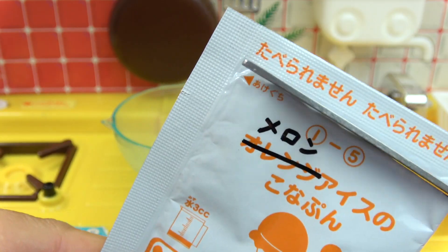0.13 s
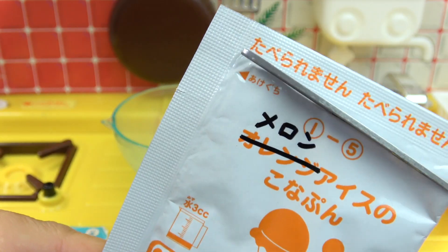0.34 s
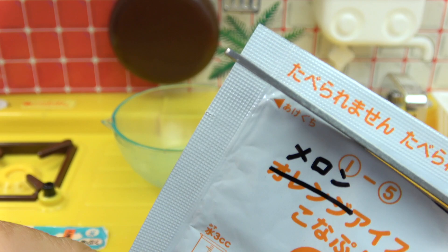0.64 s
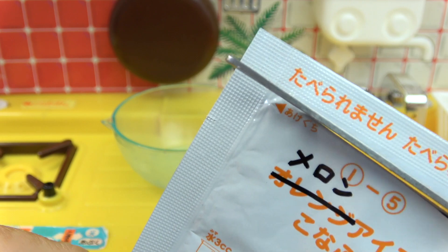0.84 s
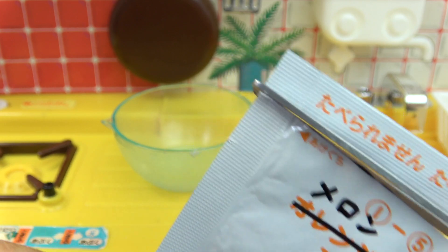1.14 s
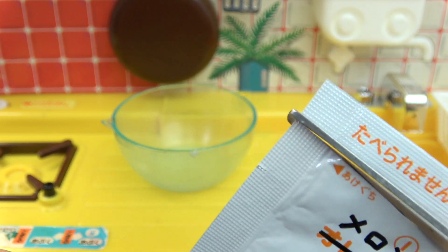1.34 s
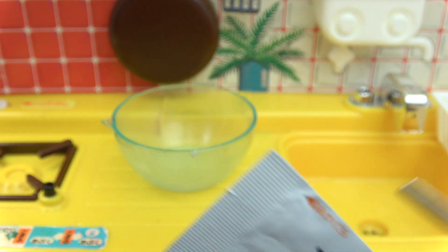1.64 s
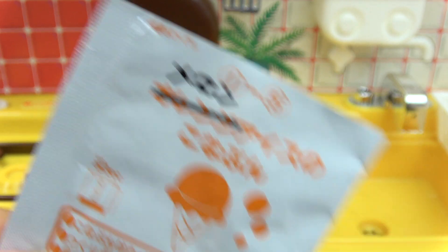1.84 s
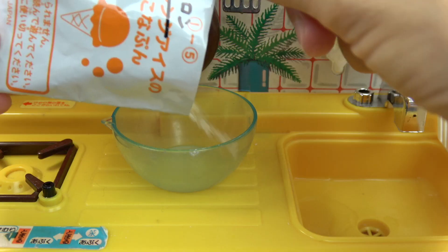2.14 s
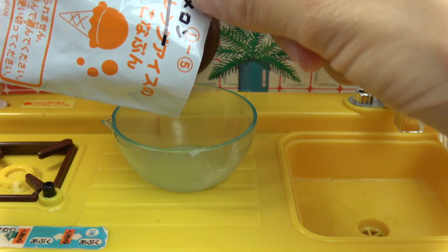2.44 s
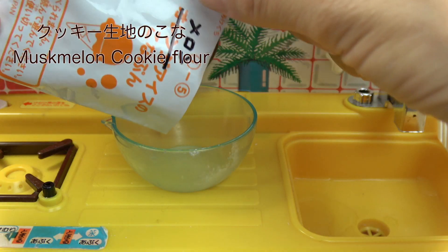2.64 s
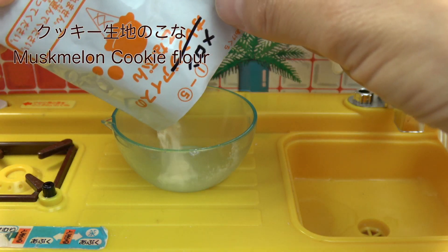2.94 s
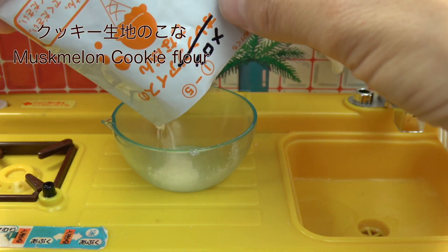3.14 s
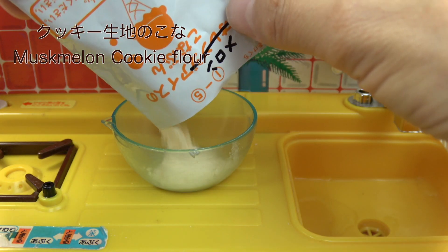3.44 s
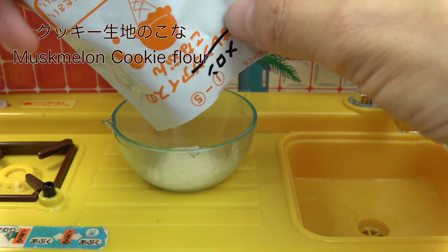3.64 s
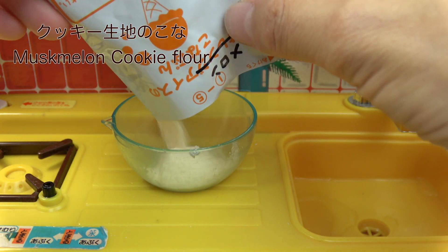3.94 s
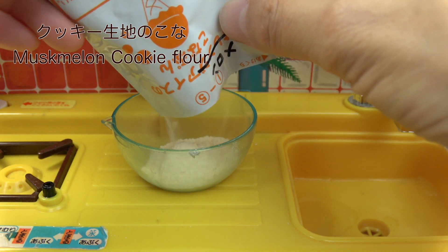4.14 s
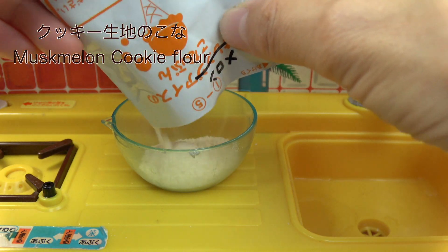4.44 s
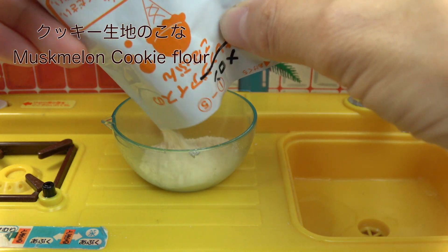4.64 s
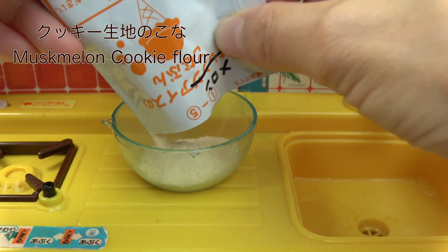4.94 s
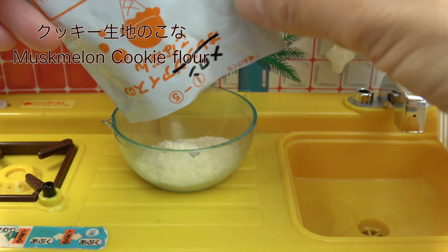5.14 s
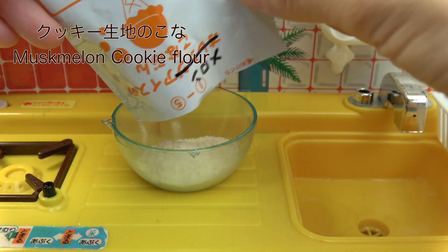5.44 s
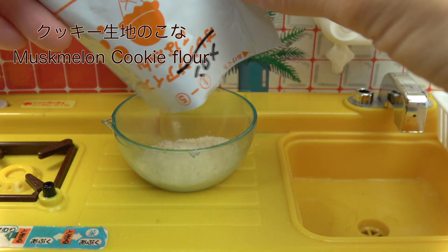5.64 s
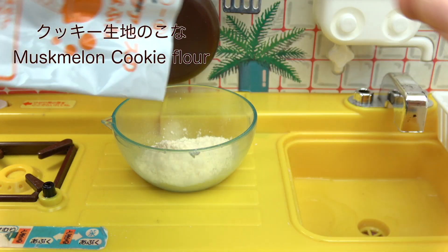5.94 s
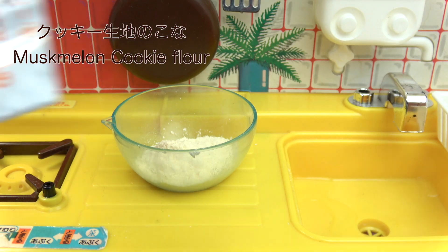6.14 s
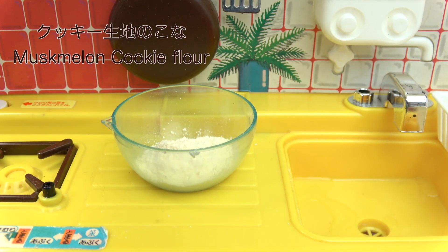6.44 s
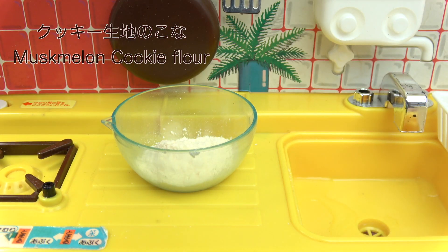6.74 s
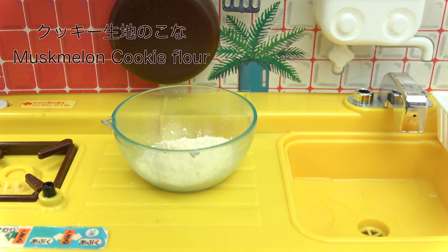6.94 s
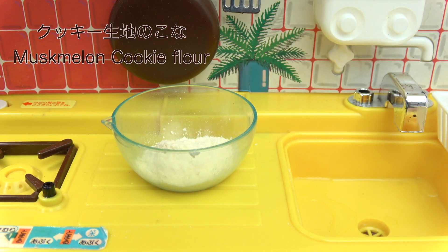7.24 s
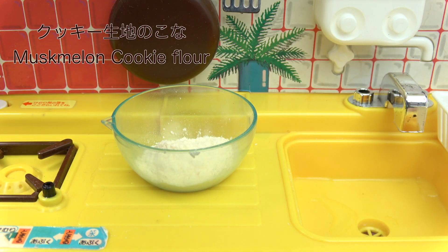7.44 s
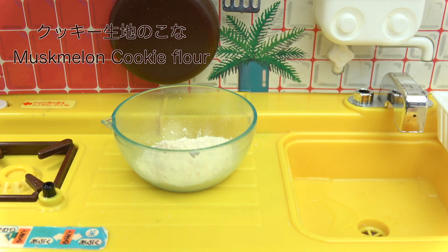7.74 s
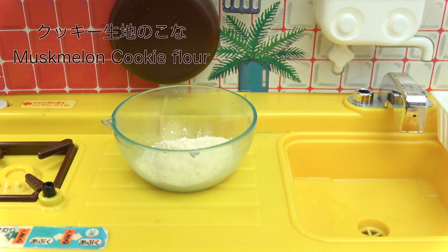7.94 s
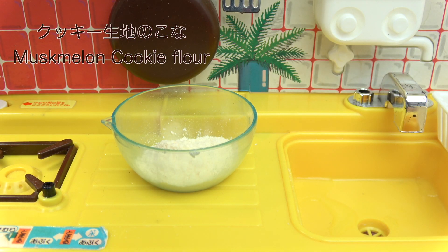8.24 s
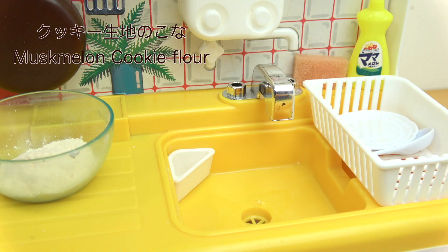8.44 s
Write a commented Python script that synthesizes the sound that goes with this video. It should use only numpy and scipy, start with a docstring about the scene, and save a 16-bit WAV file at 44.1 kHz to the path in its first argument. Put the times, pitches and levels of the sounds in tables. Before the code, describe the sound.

Close, crisp crackling of a plastic packet being handled, with a faint hiss of pouring powder and a last rustle further off.

```python
"""Emptying a plastic sachet

A sachet is turned in the fingers close by, then tipped and squeezed over a small bowl.
Each crease that buckles gives a snap, and the hollow pouch resonates like a small drum; film rubs
and powder hisses in between. The empty sachet is drawn away and crumpled further off in a quiet room."""
import sys
import numpy as np
from scipy import signal
from scipy.fft import rfft, irfft, next_fast_len
from scipy.io import wavfile
from scipy.ndimage import uniform_filter1d

SR = 44100
rng = np.random.default_rng(int(sys.argv[2]) if len(sys.argv) > 2 else 0)


def unload_wav(signal):
    """Save mono or channel-first audio to the path in sys.argv[1] as 16-bit WAV at rate SR, clipped to [-1, 1]."""
    wavfile.write(
        sys.argv[1],
        SR,
        np.round(np.clip(np.atleast_2d(signal).T, -1, 1) * 32767).astype(np.int16),
    )


N = 378907

# Reflected sound grows with the sachet's distance. Each row: time in seconds, reflected share in dB.
REFLECTED_SHARE = [(0, -19.5), (1.7, -12), (2.201, -19), (5.7, -19), (6.1, -20), (6.5, -9.5), (8.5, -4.5)]
# Spectrum of rubbed or bent film. Each row: frequency in Hz, relative level in dB.
FRICTION_SPECTRUM = [(100, -14), (170, -13.5), (450, -5.5), (1080, -0.5), (1650, -14), (2500, -8.5),
                     (5000, -9), (8800, -5), (16000, -31)]


def gain_of(db):
    """Decibels express an amplitude ratio on a logarithmic scale."""
    return 10 ** (np.asarray(db) / 20)


def unit_rms(x):
    """Normalisation brings a signal to unit mean power."""
    return x / np.sqrt(np.mean(x ** 2) + 1e-20)


def curve_at(points, hz):
    """Interpolation on a logarithmic frequency axis joins points into a curve."""
    frequencies, values = np.transpose(points)
    return np.interp(np.log(hz + 1), np.log(frequencies + 1), values)


def add(mix, start_s, sound):
    """Superposition: a sound adds to the mix from its start time on."""
    part = mix[round(start_s * SR):][:len(sound)]
    part += sound[:len(part)]


def resonance(hz, centre_hz, q):
    """A damped resonator responds most at its centre frequency, more narrowly as Q rises."""
    return 1 / np.sqrt(1 + q ** 2 * (hz / centre_hz - centre_hz / (hz + 1)) ** 2)


def minimum_phase(gain):
    """Causality: a gain curve takes the phase of a body that rings only after it is struck."""
    log_gain = np.log(np.maximum(gain / gain.max(), 1e-5))
    mirrored = np.r_[log_gain, log_gain[-2:0:-1]]
    return np.exp(np.conj(signal.hilbert(mirrored)))[:len(gain)]


def room_tone(level_db=-62.5, hum_hz=93, hum_db=-75):
    """Noise only partly alike in left and right gives murmur and hiss; narrow-band noise, a wavering hum."""
    # Each row: frequency in Hz, relative level in dB.
    spectrum = [(25, -7.5), (120, -4), (210, -3.5), (300, -4.5), (560, -5.5), (900, -10), (1400, -17),
                (4000, -22.5), (9000, -25.5), (16000, -25.5)]
    # Each row: frequency in Hz, correlation between left and right.
    correlations = [(30, .65), (100, 0.87), (500, 0.99), (3000, 1), (12000, .63)]
    size = next_fast_len(N, True)
    hz = np.fft.rfftfreq(size, 1 / SR)
    left, independent, hum_noise = rfft(rng.standard_normal((3, size)))
    correlation = curve_at(correlations, hz)
    right = correlation * left + np.sqrt(1 - correlation ** 2) * independent
    murmur = irfft(np.array([left, right]) * gain_of(curve_at(spectrum, hz)), size)[:, :N]
    hum = irfft(hum_noise * resonance(hz, hum_hz, q=8) ** 2, size)[:N]
    return gain_of(level_db) * unit_rms(murmur) + gain_of(hum_db) * unit_rms(hum)


def reverberation(x, build_s=0.0071):
    """A small room's diffuse field builds quickly and decays exponentially, sooner in the treble."""
    hz, t, noise = signal.stft(rng.standard_normal(SR // 2), SR, nperseg=256)
    t60_s = curve_at([(500, 0.63), (6000, 0.24), (14000, 0.29)], hz)[:, None]
    colour_db = curve_at([(800, -3), (5000, 0.011)], hz)[:, None]
    decaying = noise * gain_of(colour_db) * np.exp(-np.log(1000) * t / t60_s)
    tail = signal.istft(decaying, SR, nperseg=256)[1]
    tail *= 1 - np.exp(-(np.arange(len(tail)) / SR / build_s) ** 2)
    return signal.fftconvolve(x, tail / np.linalg.norm(tail))[:N]


def remoteness_db(time_s):
    """Distance raises the reflected share by this much over its value at the closest position."""
    times, share_db = np.transpose(REFLECTED_SHARE)
    return np.interp(time_s, times, share_db) - share_db.min()


def local_colour_db(hz, time_s, bounce_s=0.000856, bounce_gain=0.044):
    """Narrow resonances weaken with distance; interference with a worktop reflection adds a comb."""
    # Modes of the pouch and the space round the bowl.
    # Each row: frequency in Hz, width in Hz, gain in dB at the closest position.
    modes = [(841, 61, 8), (1253, 90, 3.5), (2858, 240, 5), (3340, 440, 7.5), (4930, 470, 4),
             (6340, 200, 4), (8600, 450, -1.5)]
    peaks_db = sum(db / (1 + (2 * (hz - centre) / width) ** 2) for centre, width, db in modes)
    nearness = gain_of(-remoteness_db(time_s))
    comb = abs(1 + bounce_gain * np.exp(-2j * np.pi * hz * bounce_s))
    return np.sqrt(nearness) * peaks_db + 20 * np.log10(comb)


def hand_bumps():
    """Each push of the hands is a soft transient, a few low cycles that swell and fade."""
    # Each row: start in seconds, peak level in dB, frequency in Hz, length in seconds.
    pushes = [(0.54, -51, 94, .094), (0.954, -44, 194, 0.011), (1.587, -56, 96, .091),
              (3.025, -49.5, 350, 0.019), (4.206, -38, 315, 0.013), (5.848, -50, 85.5, 0.069),
              (5.855, -60, 47.7, .11), (6.588, -51, 76, .12), (6.596, -58, 42.5, .15)]
    out = np.zeros(N)
    for start, db, hz, length in pushes:
        t = np.arange(0, length, 1 / SR)
        cycles = np.sin(2 * np.pi * (hz * t + rng.random()))
        add(out, start, gain_of(db) * np.hanning(len(t)) * cycles)
    return out


def rustle(swells, spectrum, grains_per_s, smooth_share, flutter_db, grain_s=0.00022, size=2048):
    """Countless tiny contacts add in power: a hiss with larger grains, swelling with each movement."""
    # Each row of swells: time of the peak in seconds, level in dB, half width in seconds.
    # Each row of spectrum: frequency in Hz, relative level in dB.
    hz, t = np.fft.rfftfreq(size, 1 / SR), np.arange(N) / SR
    grain_db = 4 * np.minimum(rng.exponential(1, N), 3)
    grains = gain_of(grain_db) * (rng.random(N) < grains_per_s / SR)
    grain_power = abs(signal.oaconvolve(grains ** 2, np.exp(-t[:size] / grain_s))[:N])
    power = smooth_share + (1 - smooth_share) * grain_power / grain_power.mean()
    contacts = np.sqrt(power) * rng.standard_normal(N)
    stick_slip = unit_rms(uniform_filter1d(rng.standard_normal(N), size=350))
    contacts *= gain_of(flutter_db * stick_slip)
    mean_time_s = np.mean(swells, axis=0)[0]
    colour_db = curve_at(spectrum, hz) + local_colour_db(hz, mean_time_s)
    sound = signal.oaconvolve(contacts, irfft(minimum_phase(gain_of(colour_db))))[:N]
    steps = t[::32]
    swell_power = sum((gain_of(db) / np.cosh(np.clip((steps - peak_s) / width, -20, 20))) ** 2
                      for peak_s, db, width in swells)
    return np.interp(t, steps, np.sqrt(swell_power)) * unit_rms(sound)


def powder_pour():
    """Powder gushes over the film into the bowl, its many small impacts merging into a hiss."""
    # Each row: time of the peak in seconds, level in dB, half width in seconds.
    gushes = [(2.97, -57, 0.14), (3.2, -70, 0.08), (3.41, -54.5, 0.094), (3.72, -64.5, .04),
              (4.03, -52.5, 0.092), (4.18, -49.5, 0.0085), (4.34, -55, 0.089), (4.67, -55.5, 0.08),
              (4.92, -61, 0.11), (5.14, -56, .02)]
    # Each row: frequency in Hz, relative level in dB.
    spectrum = [(400, -18), (800, -4), (1600, -9), (3400, -5.5), (4400, -4.5), (8200, -1.5), (16000, -20)]
    return rustle(gushes, spectrum, grains_per_s=1000, smooth_share=0.69, flutter_db=1.1)


def empty_crumple():
    """Uneven contact of film on film makes the empty sachet rustle as it is taken away."""
    # Each row: time of the peak in seconds, level in dB, half width in seconds.
    movements = [(6.07, -43.5, 0.067), (6.2, -54, 0.13), (6.335, -61, 0.061), (6.55, -58, 0.18),
                 (6.77, -57, .025), (6.92, -53.5, 0.054), (7.15, -59.5, 0.12), (7.72, -72.5, 0.096),
                 (8.16, -61, .024)]
    # Each row: frequency in Hz, relative level in dB.
    spectrum = [(40, -13), (150, 1), (600, 0), (1700, -5.5), (2900, -6), (4000, -6), (5700, -1), (8000, -3),
                (16000, -23)]
    return rustle(movements, spectrum, grains_per_s=210, smooth_share=0.93, flutter_db=4.7)


def empty_scrape():
    """Sliding friction gives brief, bright noise as the empty sachet is laid down."""
    # Each row: time of the peak in seconds, level in dB, half width in seconds.
    scrapes = [(6.785, -51, 0.012), (7.045, -53.5, 0.023), (7.086, -42.5, 0.0056)]
    # Each row: frequency in Hz, relative level in dB.
    spectrum = [(500, -24), (2000, -17), (3000, -9), (4300, -23), (5700, 0.5), (6800, -2.5), (8000, -0.5),
                (11000, -18), (16000, -30)]
    return rustle(scrapes, spectrum, grains_per_s=600, smooth_share=0.75, flutter_db=0.5)


def finger_rub():
    """Stick-slip friction of fingers on the sachet gives a fluttering hiss."""
    # Each row: time of the peak in seconds, level in dB, half width in seconds.
    strokes = [(.001, -53.5, 0.02), (.256, -44, 0.036), (.569, -41, 0.029), (2.225, -55, 0.029),
               (2.465, -55.5, 0.034), (2.54, -54.5, 0.024), (2.608, -47.5, 0.0063), (5.235, -41.5, .0051),
               (5.475, -54.5, 0.028), (5.625, -50, 0.013)]
    return rustle(strokes, FRICTION_SPECTRUM, grains_per_s=450, smooth_share=0.93, flutter_db=3.25)


def wall_flex():
    """Flexure of the pouch wall under the fingers radiates short, dull bursts."""
    # Each row: time of the peak in seconds, level in dB, half width in seconds.
    presses = [(.073, -49.5, .0037), (1.172, -44, 0.0031), (3.951, -39, 0.00088), (4.788, -43, 0.0022),
               (4.97, -44.5, .012), (5.008, -40, 0.0052), (5.165, -49, 0.01), (5.312, -35.5, .004),
               (5.343, -32.5, 0.0023), (5.711, -40, 0.0014), (7.27, -55, .012), (7.675, -63, 0.013)]
    # Each row: frequency in Hz, relative level in dB.
    spectrum = [(300, -8.5), (1000, 2.5), (3500, -16.5), (7000, -21), (16000, -35.5)]
    return rustle(presses, spectrum, grains_per_s=120, smooth_share=0.3, flutter_db=3)


def film_crackle():
    """Bending film sheds its stress in flurries of fine impulses."""
    # Each row: time of the peak in seconds, level in dB, half width in seconds.
    flurries = [(.77, -56, 0.01), (.87, -51.5, 0.028), (.918, -47, .008), (1.02, -42.5, 0.0049),
                (1.058, -50, .012), (1.309, -51, 0.0071), (2.187, -46, 0.0027), (2.8, -55.5, 0.0026)]
    return rustle(flurries, FRICTION_SPECTRUM, grains_per_s=900, smooth_share=0.22, flutter_db=0)


def buckle(start_s, energy_db, decay_s, brightness, pouch_db, scatter_s=0.006, size=4096):
    """A crease buckles in a burst of tiny slips that excites the resonances of crease and pouch."""
    # Response of the film. Each row: frequency in Hz, relative gain in dB.
    film_response = [(200, 13.5), (450, -1.5), (600, 0.5), (850, -2.5), (1200, 2.46), (1550, -1),
                     (2100, 2.3), (2700, -1.5), (3300, -4), (4100, -2.5), (5300, -5), (8500, 2.5),
                     (11500, -3.8), (15000, -5)]
    # The pouch rings low when full or slack, higher when squeezed.
    # Each row: time in seconds, resonant frequency in Hz.
    pouch_tuning = [(0, 750), (.4, 800), (.95, 900), (1.14, 640), (1.5, 620), (1.7, 780), (2.2, 1150),
                    (2.55, 750), (3.5, 830), (4.4, 944), (5.55, 1020), (5.75, 820), (6.05, 1080),
                    (6.45, 540)]
    t, hz = np.arange(size) / SR, np.fft.rfftfreq(size, 1 / SR)
    age = t / decay_s
    burst = np.sqrt(age) * np.exp(-age)
    # Scattering from nearby walls counts for more in weak or distant snaps.
    scatter_db = -21 - 0.31 * energy_db + 0.85 * remoteness_db(start_s)
    scatter = gain_of(scatter_db) * (1 - np.exp(-age)) * np.exp(-t / scatter_s)
    slips = rfft((burst + scatter) * rng.standard_normal(size))
    broad_power = abs(uniform_filter1d(abs(slips) ** 2, size=130))
    slips *= minimum_phase(1 / np.sqrt(broad_power + 1e-12))  # flat overall, with fine peaks and dips
    # A taut crease is brighter and higher; a strong snap rings more sharply.
    crease_hz, edge_hz = 4440 * 2 ** (0.4 * brightness), 7860 * 2 ** brightness
    crease_q = 1.72 * 2 ** (0.0864 * energy_db)
    crease = resonance(hz, crease_hz, crease_q) / np.sqrt(1 + (hz / edge_hz) ** 6)
    pouch_hz = np.interp(start_s, *np.transpose(pouch_tuning))
    pouch = gain_of(pouch_db) * resonance(hz, pouch_hz, q=1.304) ** 2
    colour = gain_of(curve_at(film_response, hz) + local_colour_db(hz, start_s))
    sound = irfft(slips * minimum_phase(np.hypot(crease, pouch) * colour))
    return gain_of(energy_db) * sound / np.linalg.norm(sound)


def small_snaps(snaps_per_s=75, decay_s=0.0019):
    """Under continued bending, small creases buckle at uneven intervals, each a little different."""
    # Each row: start and end in seconds, then the means of energy in dB, brightness in octaves
    # and pouch gain over the crease in dB.
    spells = [(0.169, .21, -20.5, 3, -11), (0.71, 0.773, -24, 2.3, 2), (0.797, 0.845, -18, 1.1, -3),
              (1.066, 1.129, -17, 0.86, 1.5), (1.636, 1.678, -17, 0.54, -7), (7.147, 7.275, -34, 0.083, 11)]
    out = np.zeros(N)
    for start, end, energy_db, brightness, pouch_db in spells:
        count = max(1, round((end - start) * snaps_per_s))
        for k in range(count):
            onset = start + (end - start) * (k + rng.random()) / count
            strong, taut, hollow = rng.standard_normal(3)
            snap = buckle(onset, energy_db + 3 * strong, decay_s,
                          brightness + 0.07 * taut, pouch_db + 4 * hollow)
            add(out, onset, snap)
    return out


def clear_snaps():
    """Snap-through buckling: each crease that flips releases its elastic energy as one distinct snap."""
    # Each row: start in seconds, energy in dB, decay time in seconds, brightness in octaves,
    # pouch gain over the crease in dB.
    flips = [(.2608, -7, .0008, 1.3, 8.5), (0.2672, -8.5, 0.0093, 0.25, 9.5),
             (0.2869, -5, 0.00055, 0.56, 17.5), (0.3474, -16, 0.00093, -0.86, -1),
             (0.4081, -5, 0.0021, 0.069, 3), (.45, -17, .001, -0.67, 9.5), (0.785, -20, 0.00052, 0.079, 11),
             (0.927, -4.5, 0.0019, 0.098, -0.5), (.967, -1.1, 0.00078, -0.15, -2),
             (0.9701, 0.5, 0.0011, 0.75, 1.5), (1.135, -4, 0.0014, 0.53, 3), (1.3656, -21, 0.0017, 2.2, 1),
             (1.413, -12.5, 0.0037, 1.7, 0), (1.4217, -14.5, 0.002, 1.1, 9.5),
             (1.4514, -2, 0.00093, 0.52, -2), (1.4542, 7.5, 0.00043, 1.38, -10.5),
             (1.504, -6, 0.0014, 0.62, -5), (1.5097, -11.5, 0.0021, -0.26, 2.5),
             (1.622, -11.5, 0.0025, 0.27, 0.5), (1.6361, -5.5, 0.0026, 0.26, -6),
             (1.7754, -20.5, 0.0013, -0.78, 9.5), (1.9924, -16.5, 0.0012, -0.58, 4.5),
             (2.1968, -7.5, 0.00068, -1.15, -1.5), (2.552, -10.5, 0.0021, -0.62, 11.5),
             (2.6169, -19.5, 0.0036, 0.11, 0), (3.1391, 4.5, 0.00088, 0.27, -10.5),
             (3.2338, -3, 0.0012, 0.062, -1.5), (3.4776, 0, 0.00033, -0.33, -8.5),
             (3.9603, 8.5, 0.0011, 0.13, -11.5), (4.017, -12.5, 0.0031, -0.079, 7),
             (4.0515, -11.5, 0.00082, -0.74, -6), (4.2093, -2.5, 0.00084, 0.35, -9),
             (4.227, -9, 0.0022, -0.63, 3), (4.233, -8.5, 0.00066, -0.58, 3),
             (4.244, -10.5, .0022, -0.86, 15), (4.319, -5.5, .0011, -0.72, -4.5),
             (4.336, -13, 0.00068, -0.39, 1), (4.354, -14.5, .0004, -0.43, 2),
             (4.4394, -17.5, 0.0073, -0.52, 11), (4.4745, -14.5, 0.0033, -1.1, 8),
             (4.4996, -6, 0.00074, -0.49, 0.5), (4.5557, -5.5, 0.00089, -0.67, 3.5),
             (4.5881, -12, 0.00053, -0.73, -12), (4.626, -15.5, 0.0022, 0.011, 12),
             (4.646, -7.5, 0.00083, -0.36, -15), (4.6578, -6, .0018, -0.51, 0),
             (4.668, -11.5, 0.0015, -1.4, 7), (4.7664, -4.5, 0.00063, -0.85, 0.5),
             (4.834, -11.5, 0.0011, -0.65, 23), (4.8455, -4.5, 0.00082, -0.46, -1.5),
             (4.8564, -7.5, 0.00082, -0.27, -2), (4.9191, -7.5, 0.00044, -0.43, 1),
             (4.9385, -10, 0.0011, -0.76, 1.5), (5.0217, -11, 0.0015, -0.28, 32),
             (5.0547, -5.5, 0.00066, 0.26, -4.5), (5.1148, -8.5, 0.00032, -0.52, -9),
             (5.1303, -9, 0.0043, -0.64, 3.5), (5.2729, -8, 0.0041, -0.62, 0),
             (5.2975, -8, 0.0019, -0.92, 13), (5.3192, -2.5, 0.0012, -0.37, 1.5),
             (5.3556, -7, 0.00066, -0.13, -9), (5.4307, -13, .0013, -1, -1),
             (5.435, -8.5, 0.00089, -0.21, -2), (5.4472, -10.5, 0.008, -0.17, 10),
             (5.533, -10, 0.0021, -.5, 18), (5.55, -7.6, 0.00052, -0.36, -20),
             (5.6389, -15.5, 0.00042, -1.2, 4), (5.6776, -15.5, 0.00078, -1.24, -5),
             (5.7157, 3, 0.002, 0.23, -11.5), (5.7264, -8.5, .0011, -.1, -8),
             (5.744, 4, 0.00073, 0.55, -5.5), (5.8509, -10.5, 0.0093, .6, 9.5),
             (5.9777, -4, 0.00052, -0.5, -9), (6.0113, -12, .0004, 0.14, -5),
             (6.0174, -2, 0.00021, 0.34, -2.5), (6.0335, -5, 0.005, 0.083, 2.5),
             (6.0694, -8, 0.0018, -0.15, 3.5), (6.1194, -7, 0.00011, -0.37, -4),
             (6.1475, -9.5, 0.0011, -.25, -13), (6.2892, -20, 0.0027, -0.8, 9),
             (6.379, -21, 0.00076, 0.052, 0), (6.472, -9.5, .0009, 0.57, -2),
             (6.4878, -8, 0.0049, 0.27, -11), (6.569, -19.5, 0.0021, -0.64, 1),
             (6.645, -17, 0.003, -1.2, 10.5), (6.659, -11.5, 0.0018, .4, -7),
             (6.696, -18.5, 0.0033, 0.21, -6), (6.7246, -12, .0059, .1, -3), (6.8727, -9, .0025, 0.77, -12)]
    out = np.zeros(N)
    for start, energy_db, decay_s, brightness, pouch_db in flips:
        add(out, start, buckle(start, energy_db, decay_s, brightness, pouch_db))
    return out


def scene():
    """Direct sound and reverberation superpose at the centre, over soft bumps and stereo room tone."""
    background = hand_bumps() + room_tone()
    sachet = clear_snaps() + finger_rub() + film_crackle() + wall_flex()
    sachet += powder_pour() + empty_crumple() + empty_scrape() + small_snaps()
    reflected_gain = gain_of(np.interp(np.arange(N) / SR, *np.transpose(REFLECTED_SHARE)))
    return sachet + reverberation(sachet * reflected_gain) + background


def record(dry, cutoff_hz=16200):
    """Band limiting: a linear-phase low-pass filter removes the highest treble."""
    low_pass = signal.firwin(255, cutoff_hz, window=("kaiser", 9), fs=SR)
    return signal.oaconvolve(dry, low_pass[None], "same")


dry = scene()
out = record(dry)
unload_wav(out)
```